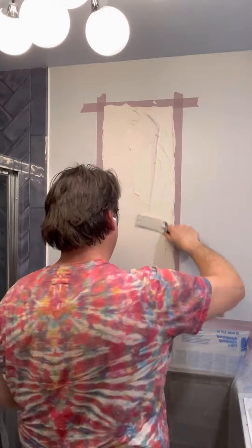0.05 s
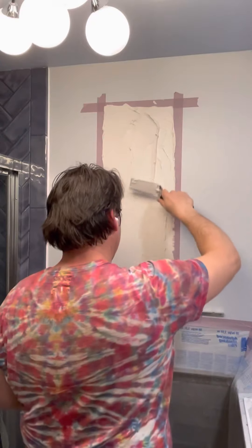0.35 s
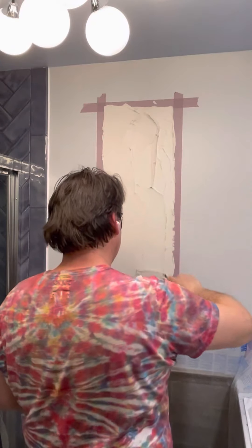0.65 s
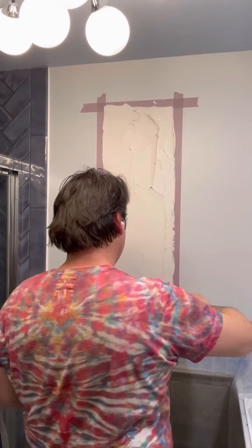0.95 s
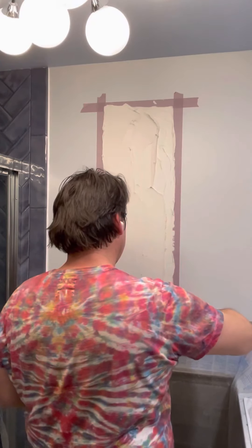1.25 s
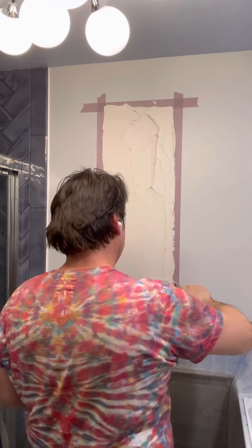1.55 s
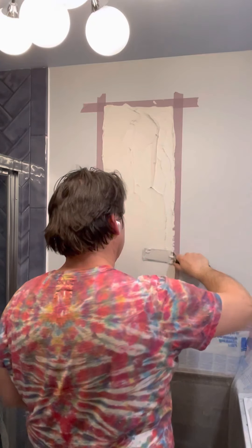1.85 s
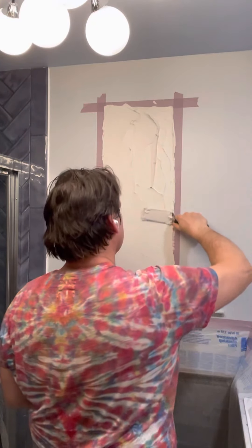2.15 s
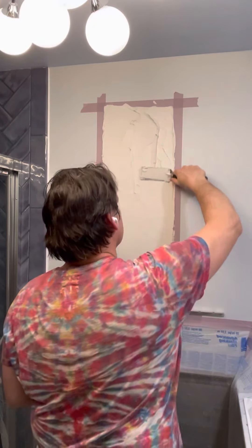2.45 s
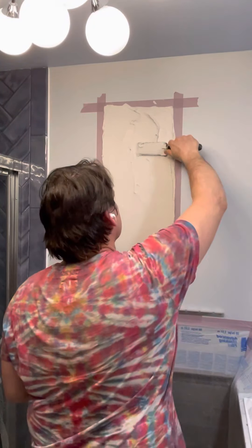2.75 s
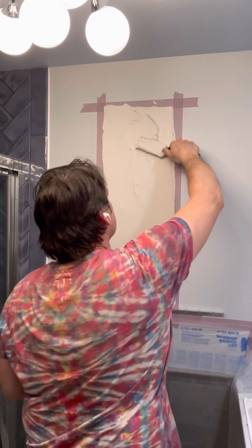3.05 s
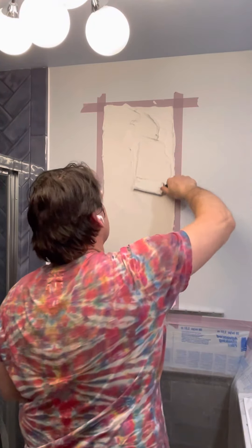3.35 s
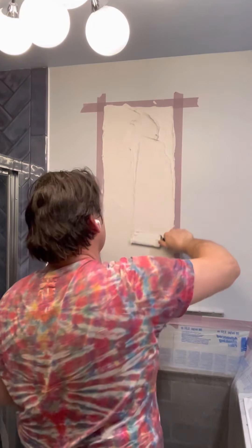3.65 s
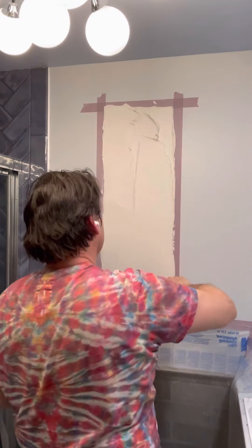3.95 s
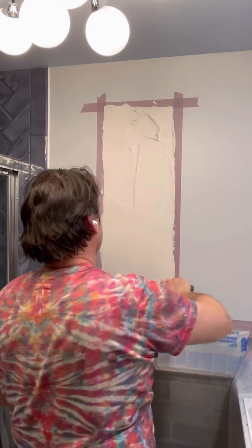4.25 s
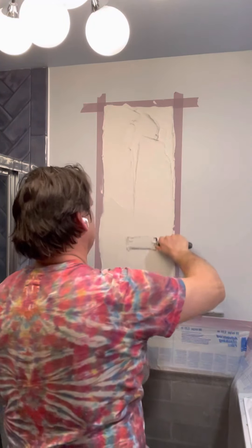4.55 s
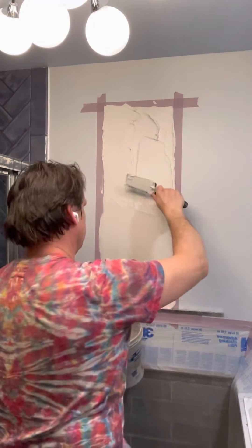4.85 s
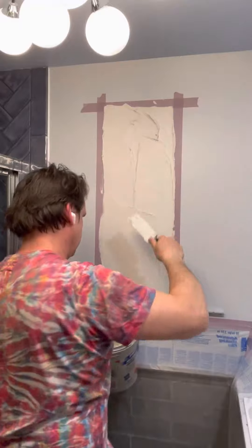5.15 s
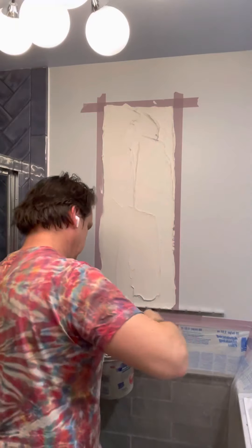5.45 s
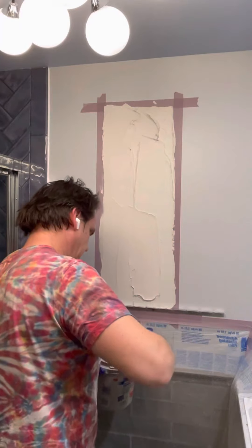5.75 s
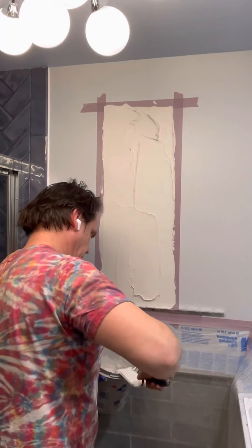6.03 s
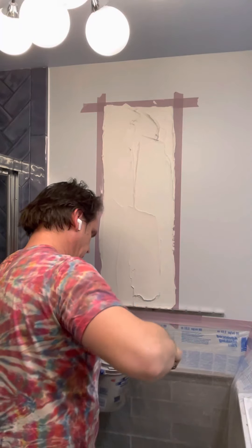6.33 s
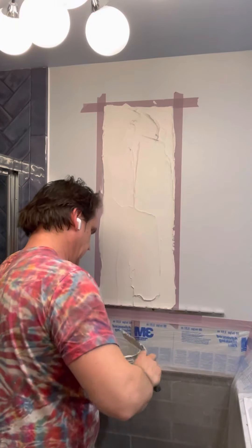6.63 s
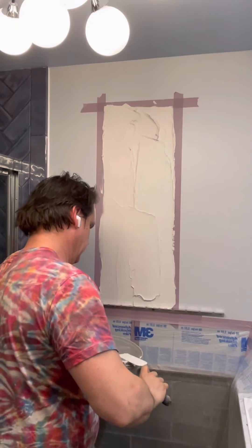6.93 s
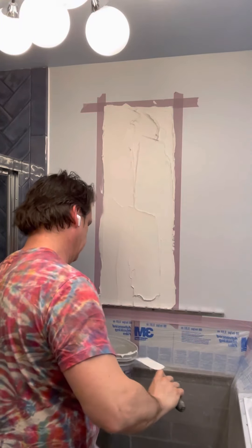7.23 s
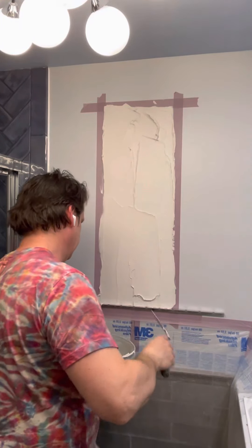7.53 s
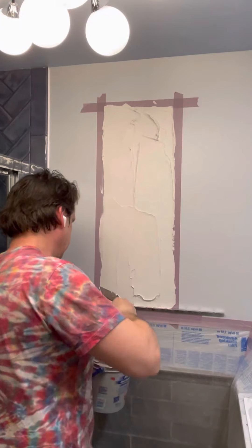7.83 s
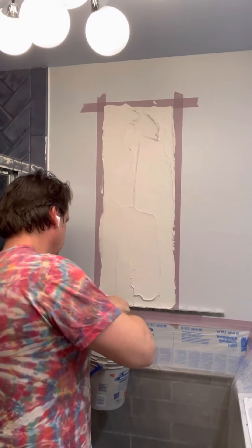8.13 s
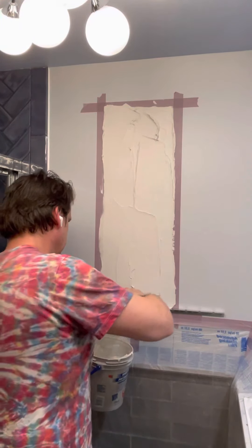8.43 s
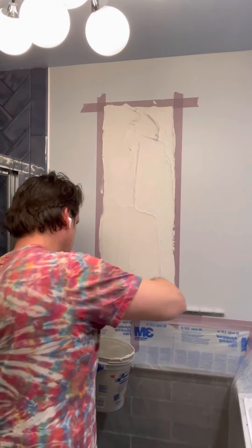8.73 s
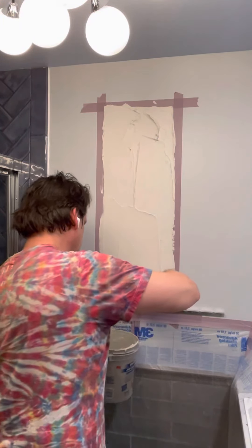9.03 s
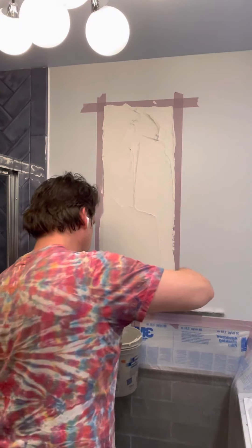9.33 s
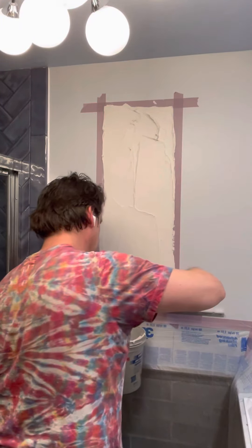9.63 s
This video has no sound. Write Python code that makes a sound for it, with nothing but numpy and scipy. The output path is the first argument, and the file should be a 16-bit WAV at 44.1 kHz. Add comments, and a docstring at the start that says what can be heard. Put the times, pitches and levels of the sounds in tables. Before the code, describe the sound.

A steel trowel spreads wet, sandy mortar on a wall, with a few sharp taps, two hard juddering scrapes and soft gliding strokes. The blade is then knocked and wiped on the rim of a plastic bucket and digs into the mortar with loud, gritty grinding. A sleeve rustles faintly over a low house rumble. The small tiled bathroom rings briefly, heard from behind the worker.

```python
"""Trowel and mortar in a tiled bathroom

A small, ringing room, with a phone microphone behind the worker. A steel trowel spreads wet mortar
on the wall: it taps down, scrapes hard twice and glides softly through the paste. Then it is knocked
and wiped on the rim of a plastic bucket and digs in for a fresh load. Sand grinds under the blade,
which sticks and slips; a sleeve rustles, and the house rumbles faintly underneath."""
import sys
import numpy as np
from scipy import signal
from scipy.fft import rfft, irfft, next_fast_len
from scipy.io import wavfile
from scipy.ndimage import uniform_filter1d, map_coordinates

SR = 44100
rng = np.random.default_rng(int(sys.argv[2]) if len(sys.argv) > 2 else 0)


def master_out(mix):
    """Clip the mix to full scale and print it as 16-bit PCM to the path in sys.argv[1]."""
    frames = np.transpose(np.atleast_2d(mix))
    ceiling = np.clip(frames, -1, 1)
    pcm = np.round(ceiling * 32767).astype(np.int16)
    wavfile.write(sys.argv[1], SR, pcm)


N = 431298

# Judder, rasp and grit are the low, middle and high bands of friction. Levels are relative.
# Strokes of the blade: t/s, length/s, rasp/dB, swell/dB, judder over rasp/dB, grit over rasp/dB
SOFT_PUSHES = [(0, 0.21, -60.5, -3, -1.5, -0.5), (.29, 0.29, -78, 8, -8, 9),
               (.53, 0.13, -71.5, 15.5, -4, -4), (.74, 0.31, -93.5, -11, -8, 20),
               (1.7, 0.19, -65, 3, 1.5, 1), (2.45, 0.29, -65, 1.5, 0, 1.5), (2.76, 0.19, -71, -11, -9, 0),
               (4.08, 0.05, -69.5, 9.5, -27, 7.5), (4.28, 0.22, -67, 8.5, -1.5, 4),
               (4.48, 0.33, -59.5, -1, -4.5, 3.5), (4.86, 0.22, -68, -9, -32, 6),
               (5.17, 0.08, -68.5, -1, -9.5, 4.5), (5.36, 0.31, -74.5, -16, 3, 0.5)]
EDGE_SCRAPES = [(1.25, 0.24, -55.5, 5, -5, -2), (1.452, 0.13, -43, -5, 7.5, 2.5)]
FLAT_SCRAPES = [(1.955, 0.089, -51.5, -9.5, -0.5, -2.5), (2.088, 0.023, -36.5, -2, -6.5, -2.5),
                (2.152, 0.066, -35, 0.5, -1, 0.5)]
SOFT_PULLS = [(3.07, 0.86, -65.5, 5.1, 0, 1)]
WIPES_ON_RIM = [(5.52, 0.15, -83.5, 30, -0.5, 9), (5.69, 0.083, -51, 16.5, 12, -0.5),
                (5.755, 0.28, -41.5, -1, 1.5, -5.5), (5.9, 0.09, -38, -4, -2, -3),
                (6.0, 0.12, -41.5, -4.5, -1.5, -3.5), (6.36, 0.32, -87, -9, 8, -11),
                (6.8, 0.093, -55.5, -16.5, 1.5, -8.5), (6.95, 0.27, -43.5, 1.5, -3.5, -5),
                (7.13, 0.086, -40, 7.5, 1, -5)]
BUCKET_DIGS = [(8.68, 0.133, -49, 10, 10.3, -0.5), (8.815, 0.11, -38.5, 0.5, 4.7, 2),
               (9.003, 0.082, -34, -3, 4.9, -0.5), (9.17, 0.273, -36.5, -1.5, 4.1, -1.5),
               (9.48, 0.36, -38, -1.5, 1.1, -2)]
# The blade touching down on the wall: t/s, judder/dB, rasp/dB, grit/dB
TOUCHDOWNS = [(.1175, -57, -46.5, -49.5), (.144, -50, -63, -65), (1.166, -45, -42.5, -46),
              (1.187, -43, -44.5, -44), (1.228, -47, -47.5, -63), (1.376, -47.5, -49.5, -46),
              (1.907, -48, -53, -53), (1.943, -43.5, -41.5, -41), (2.089, -47.5, -42, -39),
              (2.374, -52, -48, -55.5), (4.436, -44.5, -49.5, -47), (4.459, -55.5, -62, -48.5)]
# Bare steel striking the wall, and wet mortar snapping: t/s, level/dB
STEEL_STRIKES = [(0.1192, -37.5), (.131, -39), (1.166, -51), (1.229, -33)]
MORTAR_SNAPS = [(0.384, -66), (0.516, -45), (0.66, -40), (0.7654, -44.5), (5.1424, -50), (5.336, -47),
                (5.45, -38), (6.32, -55.5), (6.5294, -47.5), (8.1724, -53), (8.241, -50.5)]
# Coarse sand jamming under the blade: t/s, rasp/dB, grit/dB, f/Hz
GRAIN_JAMS = [(1.442, -51.5, -42, 3970), (1.495, -41, -44, 3200), (1.553, -44, -41, 3950),
              (2.09, -46, -35.5, 4170), (6.772, -43.5, -45, 3050), (7.223, -27.5, -36, 3060),
              (8.5652, -57, -43.5, 3300), (8.8112, -52, -32, 3880), (8.892, -27, -45, 2580),
              (8.993, -25.5, -31.5, 1370), (9.041, -40, -33, 12500), (9.07, -31.5, -36, 2460),
              (9.166, -24, -30, 5070), (9.258, -33, -34, 11300), (9.356, -29, -31.5, 4270),
              (9.545, -29, -32, 6900), (9.602, -27, -32, 6800), (9.694, -26, -27, 3860),
              (9.738, -24, -35, 2670)]
# The blade locking into a note: t/s, length/s, first f/Hz, last f/Hz, level/dB
BLADE_GROANS = [(1.469, 0.0498, 490, 440, -38), (1.56, .055, 345, 325, -40), (5.735, .075, 365, 385, -44),
                (6.0, .045, 435, 460, -40), (7.113, .042, 358, 346, -38.5), (7.19, .03, 350, 340, -45)]
# Knocks on the bucket: t/s, judder/dB, rasp/dB, grit/dB, thud f/Hz, ring f/Hz, ring level/dB
BUCKET_HITS = [(5.641, -35, -41.5, -46, 486, 1400, -44), (5.651, -32, -48, -47.5, 306, 2140, -48),
               (6.716, -37.5, -38.5, -61, 350, 1863, -33), (6.723, -30, -42, -69, 434, 1366, -34),
               (6.732, -41, -48, -65.5, 248, 2050, -40.5), (7.546, -89, -58.5, -89, 173, 1403, -56),
               (8.576, -34.5, -79, -46, 227, 955, -39), (8.611, -43, -77, -57, 242, 980, -50),
               (8.678, -42, -70, -48, 345, 1165, -50), (8.714, -31, -63, -50, 247, 1090, -48)]
# Swings of the arm in its sleeve: t/s, length/s, level/dB, swell/dB
ARM_SWINGS = [(6.29, 0.33, -80.5, 5), (7.721, 0.25, -66, 4.5), (8.04, 0.15, -69.5, -10),
              (8.285, 0.31, -80, 9)]

# Spectra of the house rumble, each kind of contact and the shirt: f/Hz, level/dB
RUMBLE_COLOUR = [(15, -27.5), (30, -5.5), (60, 3.5), (110, -3), (200, -10.5), (500, -16.5), (1500, -23),
                 (6000, -32.5), (15500, -34)]
PUSH_COLOUR = [(60, 4.5), (170, -5.5), (300, -7), (480, -8), (1000, -11), (2000, -7.5), (2900, -10),
               (5000, -8), (7500, -11.5), (12000, -10), (15500, -22.5)]
TAP_COLOUR = [(50, -10.5), (130, 7), (400, 4), (800, 2.5), (1400, -3.5), (2000, -6.5), (3000, -6),
              (5000, -13.5), (7500, -16), (12000, -20), (15500, -24)]
EDGE_COLOUR = [(50, -22.5), (170, -11), (240, -8.5), (310, -9.5), (470, -6.5), (700, -10), (1100, -14.5),
               (1400, -8.5), (1900, -14.5), (2800, -15), (4500, -16), (7000, -22.5), (12000, -28.5),
               (15500, -37)]
FLAT_COLOUR = [(50, -16.5), (130, 0), (190, -6), (380, 0), (650, -1.5), (1000, -0.5), (1500, -4),
               (2100, -8.5), (2800, -4.5), (4300, -6.5), (7000, -17), (12000, -21.5), (15500, -30.5)]
PULL_COLOUR = [(60, 9.5), (170, -2.5), (300, -0.5), (480, -5), (850, -4), (1400, -6.5), (2200, -13.5),
               (4500, -6.5), (7500, -11), (12000, -9.5), (15500, -21)]
RIM_COLOUR = [(50, -23.5), (140, -14.5), (230, -1), (400, 1.5), (520, 1.5), (700, -0.5), (1100, -6),
              (1700, -6.5), (2700, -8), (4500, -16.5), (7000, -19.5), (12000, -20.5), (15500, -28)]
KNOCK_COLOUR = [(50, -21), (120, -28), (240, 4.5), (420, -2.5), (600, -3), (800, -12), (1100, -17.5),
                (1900, -15), (3000, -27.5), (6000, -41), (12000, -41.5), (15500, -50.5)]
CLOTH_COLOUR = [(300, -13), (1100, -24), (2500, -1), (4000, 3.5), (7000, 0), (12000, 0.5), (15500, -10.5)]
DIG_COLOUR = [(50, -18.5), (100, -16.5), (145, 0), (240, -3), (400, -3.5), (750, -4), (1200, -13.5),
              (2600, -15), (4000, -17), (7000, -18.5), (12000, -19.5), (15500, -26.5)]
# Resonances of the blade rubbing the wall, the blade striking it, and the bucket:
# f/Hz, width/Hz, level/dB
BLADE_MODES = [(317, 14, -0.5), (452, 34, -2.5), (670, 30, 2), (784, 40, -1.5), (1380, 36, -12),
               (2560, 13, -10), (3170, 35, -16), (4020, 73, -8.5), (5100, 120, -10.5)]
CLACK_MODES = [(880, 90, -6.5), (1350, 120, -2), (2083, 71, 2), (2930, 110, -3.5), (3810, 60, -5.5),
               (5170, 58, -7)]
BUCKET_MODES = [(217, 17, 0.5), (254.2, 16, 1.5), (352, 15, -2), (460, 10, -5), (530.5, 11, 0.5),
                (1088, 7.8, 3), (1375, 45, 0.5), (1700, 17, 0.5), (1762, 18, -1), (2430, 12, -0.5),
                (2537, 34, 0.5), (3500, 70, -2), (4700, 28, -2.5), (5070, 110, -5.5)]
# The blade ringing freely: f/Hz, level/dB, t60/s
FREE_BLADE_MODES = [(1360, -3, .2), (1670, -7, .18), (3010, -2, 0.24), (3075, 0.5, .26), (5040, -7.5, .26),
                    (5280, -9, .3), (7220, -17, .25)]
# Resonances sliding as the blade tilts on the wall or crosses the bucket: t/s, hollow f/Hz, rasp f/Hz
WALL_GLIDE = [(1.45, 490, 2550), (1.52, 465, 3140), (1.61, 327, 2720), (2.16, 624, 2800), (2.24, 319, 2850),
              (2.45, 356, 2400), (2.7, 356, 4400), (3.151, 800, 2160), (3.7, 320, 2140), (4.0, 310, 2300),
              (4.5, 620, 2900), (4.75, 577, 3020), (5.05, 400, 3260), (5.4, 290, 3000)]
BUCKET_GLIDE = [(5.72, 240, 1400), (5.81, 264, 1600), (5.88, 400, 1680), (5.96, 342, 2200),
                (6.0, 463, 2200), (6.07, 440, 2050), (6.12, 328, 1750), (6.95, 413, 2080),
                (7.12, 354, 1590), (7.21, 400, 1750), (7.3, 490, 1399), (8.72, 227.6, 994),
                (8.88, 187, 2950), (9.03, 282, 1510), (9.2, 346, 1480), (9.4, 225, 2500), (9.56, 535, 1670),
                (9.76, 540, 1730)]

# Decay of the tiled room: f/Hz, t60/s
ROOM_DECAY = [(100, 0.5), (300, 0.3), (1000, 0.4), (4000, 0.32), (12000, 0.19)]
# Stereo width at the microphone: f/Hz, side over mid/dB
STEREO_WIDTH = [(30, -17), (60, -12.5), (140, -11.5), (330, -5), (770, 1), (1300, 1), (3000, -0.5),
                (6400, 0), (7600, 6.5), (8750, 34), (9800, 6), (12000, -3.5), (13500, -40)]
# Balance of the two microphone ports: f/Hz, left over right/dB
PORT_BALANCE = [(100, -1), (400, 0), (2400, 0.5), (4400, 3.5), (8000, 1.14), (12000, -1)]


def amp(db):
    """Decibels to gain."""
    return 10 ** (np.asarray(db) / 20)


def unit(x):
    """x at rms 1."""
    return x / np.sqrt(np.mean(x ** 2) + 1e-20)


def along(points, hz):
    """(f/Hz, value) points read on a log frequency axis."""
    f, v = np.transpose(points)
    return np.interp(np.log(hz + 1), np.log(f + 1), v)


def wobble(rate):
    """A smooth random curve, rate knots a second."""
    knots = rng.standard_normal(int(N * rate / SR) + 4)
    steps = np.arange(0, N, 32)
    return np.interp(np.arange(N), steps, map_coordinates(knots, [steps * rate / SR]))


def filtered(x, response):
    """x through a complex frequency response."""
    m = next_fast_len(N + 8192)
    return irfft(rfft(x, m) * response(np.fft.rfftfreq(m, 1 / SR)), m)[..., :N]


def ringing(modes, hz):
    """A flat response with resonances standing on it."""
    return 1 + sum(amp(db) * 1j * hz * width / (f * f - hz * hz + 1j * hz * width)
                   for f, width, db in modes)


def tone(s, hz, db, t60, attack):
    """One struck mode, starting at s seconds."""
    t = np.arange(SR // 2) / SR
    envelope = amp(db - 60 * t / t60) * (1 - np.exp(-t / attack))
    out = np.zeros(N + SR)
    out[round(s * SR):][:len(t)] = envelope * np.sin(2 * np.pi * hz * t)
    return out[:N]


def rumble(channels):
    """Deep noise of rms 1."""
    noise = rng.standard_normal((channels, N))
    return unit(filtered(noise, lambda hz: amp(along(RUMBLE_COLOUR, hz)) * hz / (hz + 25)))


def room_tone(level_db=-75, waver_db=2, lull_at_s=8, lull_s=0.59, depth_db=-15.5, fade_s=0.067):
    """The low, wavering rumble of the house, as mid and side; the level dips briefly once."""
    t = np.arange(N) / SR - lull_at_s
    lull_db = np.interp(t, [-fade_s, 0, lull_s, lull_s + fade_s], [0, depth_db, depth_db, 0])
    return amp(level_db + lull_db + waver_db * wobble(18)) * rumble(channels=2)


def pressure(start, length, db, swell_db, attack_s, release_t60, arch_db):
    """Gain of one stroke: the hand leans in (20 dB per attack_s), arches or sags midway, and lifts."""
    t = np.arange(N) / SR - start
    progress = np.clip(t / length, 0, 1)
    held_db = db + swell_db * (progress - .5) + arch_db * np.sin(np.pi * progress)
    ends_db = 20 * np.minimum(t, 0) / attack_s - 60 * np.maximum(t - length, 0) / release_t60
    return amp(np.maximum(held_db + ends_db, -600))


def strokes(rows, attack_s, release_t60, arch_db):
    """Judder, rasp and grit gains follow one pressure; where strokes overlap, the stronger wins."""
    gains = [amp([[judder], [0], [grit]]) * pressure(*stroke, attack_s, release_t60, arch_db)
             for *stroke, judder, grit in rows]
    return np.max(gains, axis=0)


def sand(rate, spread_db):
    """Grains crack at random, rate a second, a few much louder than the rest."""
    when, draw, sign = rng.random((int(rate * N / SR), 3)).T
    size = amp(spread_db * np.minimum(-np.log(1 - draw), 4.5))
    return unit(np.bincount((when * N).astype(int), size * np.sign(sign - .5), N))


def slips(rate, scatter):
    """The blade sticks and lets go in a train of jolts; scatter makes the gaps uneven."""
    gap, size = rng.standard_normal((int(2 * rate * N / SR), 2)).T
    when = (np.cumsum(np.exp(scatter * gap)) * SR / rate).astype(int)
    return unit(np.bincount(when[when < N], amp(2 * size[when < N]), N))


def friction(levels, colour, modes, slip_hz, scatter, grain_rate, spread_db, flutter_db, trim_db):
    """Slips make the body judder, sand adds rasp and grit above; all three ring in the body's modes."""
    grains = sand(grain_rate, spread_db)
    jolts = slips(slip_hz, scatter)
    m = next_fast_len(N + 8192)
    hz = np.fft.rfftfreq(m, 1 / SR)
    low = 1 / (1 + (hz / 800) ** 8)
    high = 1 - 1 / (1 + (hz / 3500) ** 8)
    body = amp(along(colour, hz)) * hz ** 2 / (hz ** 2 + 35 ** 2)
    drive = rfft(np.array([jolts + 0.36 * grains, grains + 0.33 * jolts, grains]), m)
    bands = irfft(drive * body * [low, 1 - low - high, high], m)[:, :N]
    bite = amp(flutter_db * unit(wobble(55) + wobble(160)))  # the edge bites unevenly
    scrape = sum(unit(band * bite) * level * amp(db) for band, level, db in zip(bands, levels, trim_db))
    grid = np.geomspace(10, SR / 2, 16000)
    return filtered(scrape, lambda hz: np.interp(hz, grid, ringing(modes, grid)))


def moving_contact(x, track, boosts_db, widths_oct, wander_oct, wander_rate=9):
    """Two resonances slide in pitch as the point of contact moves, and wander as the hand rocks."""
    hz, t, spectrum = signal.stft(x, SR, nperseg=1024)
    times, *centres = np.transpose(track)
    gain_db = 0
    for centre, db, width in zip(centres, boosts_db, widths_oct):
        rocking = wander_oct * np.interp(t, np.arange(N) / SR, wobble(wander_rate))
        octaves_off = np.log2((hz[:, None] + 1) / np.interp(t, times, centre)) + rocking
        gain_db += db * np.exp(-.5 * (octaves_off / width) ** 2)
    return signal.istft(spectrum * amp(gain_db), SR, nperseg=1024)[1][:N]


def boom(levels, level_db, growth):
    """The wall or bucket flexes under the blade, as the pressure to the power growth."""
    rasp = levels[1]
    return amp(level_db) * (rasp / rasp.max()) ** growth * rumble(channels=1)[0]


def crackle(levels, rate=45, level_db=-75, growth=0.38, highpass_hz=5000):
    """Air pockets in the wet paste burst at random while the blade moves through it."""
    grit = levels[2]
    pops = unit(filtered(sand(rate, spread_db=2.0), lambda hz: 1j * hz / (highpass_hz + 1j * hz)))
    return amp(level_db) * (grit / grit.max()) ** growth * pops


def blows(rows, t60, attack):
    """Judder, rasp and grit gains of impacts: each jumps up and dies away."""
    t = np.arange(SR // 3) / SR
    envelope = (1 - np.exp(-t / attack)) * amp(-60 * t / t60)
    levels = np.zeros((3, N + SR))
    for s, *band_db in rows:
        levels[:, round(s * SR):][:, :len(t)] += amp(band_db)[:, None] * envelope
    return levels[:, :N]


def trowel_on_wall():
    """The blade glides through the paste, touches down, and makes the wall boom with two hard scrapes."""
    on_edge = strokes(EDGE_SCRAPES, attack_s=0.054, release_t60=0.079, arch_db=-0.5)
    laid_flat = strokes(FLAT_SCRAPES, attack_s=0.043, release_t60=0.34, arch_db=0.5)
    pushes = strokes(SOFT_PUSHES, attack_s=0.067, release_t60=0.13, arch_db=-0.5)
    pulls = strokes(SOFT_PULLS, attack_s=0.19, release_t60=0.75, arch_db=2.5)
    touches = blows(TOUCHDOWNS, t60=0.094, attack=0.0034)
    edge = friction(on_edge, EDGE_COLOUR, BLADE_MODES, slip_hz=153.0, scatter=0.055,
                    grain_rate=2300, spread_db=4.0, flutter_db=2.5, trim_db=[-1, 1, 1])
    flat = friction(laid_flat, FLAT_COLOUR, BLADE_MODES, slip_hz=139.6, scatter=.4,
                    grain_rate=3000, spread_db=-0.5, flutter_db=1.5, trim_db=[-1, 0, 1])
    up = friction(pushes, PUSH_COLOUR, BLADE_MODES, slip_hz=406.2, scatter=0.65,
                  grain_rate=4000, spread_db=2.0, flutter_db=1.5, trim_db=[-2, 0, 2])
    down = friction(pulls, PULL_COLOUR, BLADE_MODES, slip_hz=399.6, scatter=0.67,
                    grain_rate=6000, spread_db=3.5, flutter_db=1.5, trim_db=[-2, 1, 1])
    taps = friction(touches, TAP_COLOUR, CLACK_MODES, slip_hz=300.8, scatter=.5,
                    grain_rate=6500, spread_db=3.5, flutter_db=3.0, trim_db=[3, 5, 5])
    booms = boom(on_edge, level_db=-49, growth=0.34)
    booms += boom(laid_flat, level_db=-46.5, growth=0.99)
    booms += boom(pushes + pulls, level_db=-71, growth=0.36)
    scrapes = moving_contact(edge + flat + up + down, WALL_GLIDE,
                             boosts_db=[4.5, 4.5], widths_oct=[.25, .16], wander_oct=0.17)
    return amp(-0.74) * scrapes + taps + booms + crackle(pushes)


def steel_clacks(damping=1.2, thud_hz=225, thud_db=-6, thud_t60=0.076):
    """The bare edge strikes through the paste: the blade rings briefly and the wall thuds."""
    out = np.zeros(N)
    for s, db in STEEL_STRIKES:
        for hz, width, mode_db in CLACK_MODES:
            t60 = np.log(1000) / (np.pi * width * damping)
            out += tone(s, hz, db + mode_db, t60, attack=0.00081)
        out += tone(s, thud_hz, db + thud_db, thud_t60, attack=0.004)
    return out


def mortar_snaps(t60=0.0091, gain_db=-1, highpass_hz=4500):
    """Sticky mortar lets go with tiny bright snaps."""
    t = np.arange(SR // 20) / SR
    out = np.zeros(N + SR)
    for s, db in MORTAR_SNAPS:
        out[round(s * SR):][:len(t)] += amp(db + gain_db - 60 * t / t60) * rng.standard_normal(len(t))
    return filtered(out[:N], lambda hz: 1j * hz / (highpass_hz + 1j * hz))


def grain_bursts(rasp_db=-0.5, grit_db=4, ring_db=6.0, ring_q=11, attack_s=0.00054, t60=0.08):
    """Coarse grains jam under the edge and burst, each with a pitch of its own."""
    t = np.arange(SR // 5) / SR
    hz = np.fft.rfftfreq(len(t), 1 / SR)
    envelope = (1 - np.exp(-t / attack_s)) * amp(-60 * t / t60)
    bands = amp(along(DIG_COLOUR, hz)) * np.array([(hz > 750) & (hz < 3500), hz >= 3500])
    grains = np.tile(sand(rate=5000, spread_db=1.5), 2)
    out = np.zeros(N + SR)
    for s, rasp, grit, pitch in GRAIN_JAMS:
        at = round(s * SR)
        resonance = ringing([(pitch, pitch / ring_q, ring_db)], hz)
        low, high = irfft(rfft(grains[at:at + len(t)]) * bands * resonance, len(t))
        burst = amp(rasp + rasp_db) * unit(low) + amp(grit + grit_db) * unit(high)
        out[at:at + len(t)] += envelope * burst
    return out[:N]


def blade_groans(waver=.035, flutter_db=2, octave_db=-15):
    """Under steady pressure the slips fall into step and the blade sounds a hollow, unsteady note."""
    glide = [point for s, length, first, last, _ in BLADE_GROANS
             for point in ((s, first), (s + length, last))]
    hz = np.interp(np.arange(N) / SR, *np.transpose(glide)) * (1 + waver * wobble(90))
    phase = 2 * np.pi * np.cumsum(hz) / SR
    gain = sum(pressure(s, length, db, swell_db=0, attack_s=.025, release_t60=.045, arch_db=0.5)
               for s, length, _, _, db in BLADE_GROANS)
    return gain * amp(flutter_db * wobble(70)) * (np.sin(phase) + amp(octave_db) * np.sin(2 * phase))


def trowel_in_bucket():
    """The blade is wiped over the rim, then grinds through the mortar inside the bucket."""
    wipes = strokes(WIPES_ON_RIM, attack_s=0.048, release_t60=0.19, arch_db=2.5)
    digs = strokes(BUCKET_DIGS, attack_s=0.075, release_t60=0.57, arch_db=1.5)
    # the stiff rim does not reach the two deepest modes
    rim = friction(wipes, RIM_COLOUR, BUCKET_MODES[2:], slip_hz=129.9, scatter=.5,
                   grain_rate=3500, spread_db=2.0, flutter_db=2.5, trim_db=[-5, -2, 1])
    scoop = friction(digs, DIG_COLOUR, BUCKET_MODES, slip_hz=139.8, scatter=.7,
                     grain_rate=2600, spread_db=2.5, flutter_db=1.5, trim_db=[-5.5, -2.5, 0])
    scrapes = moving_contact(rim + scoop, BUCKET_GLIDE,
                             boosts_db=[7, 4.5], widths_oct=[.22, .13], wander_oct=.06)
    pops = crackle(digs, rate=130, level_db=-56, growth=1.0, highpass_hz=9000)
    booms = boom(wipes, level_db=-62.5, growth=0.12) + boom(digs, level_db=-47.0, growth=0.84)
    return scrapes + pops + booms


def bucket_knocks(thud_db=6, thud_t60=0.087, ring_t60=.09, sway_hz=130, sway_db=-7):
    """The plastic thuds and rings at pitches set by where the blade hits, and the full bucket sways."""
    levels = blows([row[:4] for row in BUCKET_HITS], t60=0.093, attack=0.00053)
    out = friction(levels, KNOCK_COLOUR, BUCKET_MODES[1:], slip_hz=207.8, scatter=0.37,
                   grain_rate=7600, spread_db=0.0, flutter_db=0.5, trim_db=[-2, 1, 3])
    for s, judder_db, _, _, thud_hz, ring_hz, ring_db in BUCKET_HITS:
        out += tone(s, thud_hz, judder_db + thud_db, thud_t60, attack=0.002)
        out += tone(s, ring_hz, ring_db, ring_t60, attack=0.0015)
        out += tone(s, sway_hz, judder_db + sway_db, t60=0.094, attack=0.01)
    return out


def sleeve_rustle(gain_db=1):
    """The shirt rubs as the arm swings."""
    rub = unit(filtered(sand(rate=8700, spread_db=3.5), lambda hz: amp(along(CLOTH_COLOUR, hz))))
    swings = sum(pressure(*swing, attack_s=0.13, release_t60=.12, arch_db=-3.5) for swing in ARM_SWINGS)
    return amp(gain_db) * rub * swings


def blade_flick(s=7.226, level_db=-46):
    """The blade springs off the rim and rings freely."""
    return sum(tone(s, hz, level_db + db, t60, attack=0.00093) for hz, db, t60 in FREE_BLADE_MODES)


def echoes(direct_db, early_db, early_t60):
    """Mid and side response from one spot: direct sound, a burst off the near walls, the tiled tail."""
    hz, t, noise = signal.stft(rng.standard_normal((2, SR // 2)), SR, nperseg=256)
    tail = signal.istft(noise * amp(-60 * t / along(ROOM_DECAY, hz)[:, None]), SR, nperseg=256)[1]
    t = np.arange(tail.shape[1]) / SR
    early = rng.standard_normal(tail.shape) * (rng.random(tail.shape) < .1) * amp(-60 * t / early_t60)
    response = tail / np.linalg.norm(tail[0]) + amp(early_db) * early / np.linalg.norm(early[0])
    response[0, 0] += amp(direct_db)
    # in every broad band the room passes the same power and favours neither side
    mid, side = rfft(response, SR)
    power = lambda a, b: uniform_filter1d((a * b.conj()).real, size=80)
    side = side - mid * power(side, mid) / power(mid, mid)
    even = [channel / np.sqrt(np.abs(power(channel, channel))) for channel in (mid, side)]
    return irfft(even, SR)[:, :SR // 2]


def bathroom(x, direct_db, early_db, early_t60, move_s=.4):
    """The hand keeps moving, so every move_s the work fades into a fresh pattern of echoes."""
    hop = int(move_s * SR)
    fade = np.sin(np.linspace(0, np.pi, 2 * hop)) ** 1.25
    x = np.pad(x, (hop, 2 * hop))
    out = np.zeros((2, len(x) + SR))
    for at in range(0, N + hop, hop):
        stretch = x[at:at + 2 * hop] * fade
        wet = signal.fftconvolve(stretch[None], echoes(direct_db, early_db, early_t60), axes=1)
        out[:, at:at + wet.shape[1]] += wet
    return out[:, hop:hop + N]


def scene():
    """The work and the room from behind, as left and right; the stereo width changes with frequency."""
    work = trowel_on_wall() + trowel_in_bucket() + bucket_knocks() + blade_groans() + steel_clacks()
    work += grain_bursts() + blade_flick() + mortar_snaps() + sleeve_rustle()
    field = bathroom(work, direct_db=0.5, early_db=1.5, early_t60=0.06) + room_tone()
    angle = lambda hz: np.arctan(amp(along(STEREO_WIDTH, hz)))
    mid, side = filtered(field, lambda hz: np.array([np.cos(angle(hz)), np.sin(angle(hz))]))
    return np.array([mid + side, mid - side])


def record(dry, top_hz=15850):
    """The phone microphone: its left port is a little brighter, and the treble ends steeply at top_hz."""
    balance = lambda hz: amp(np.outer([.5, -.5], along(PORT_BALANCE, hz)))
    lowpass = lambda hz: 1 / (1 + np.exp(np.minimum((hz - top_hz) / 40, 50)))
    return filtered(dry, lambda hz: balance(hz) * lowpass(hz))


dry = scene()
out = record(dry)
master_out(out)
```